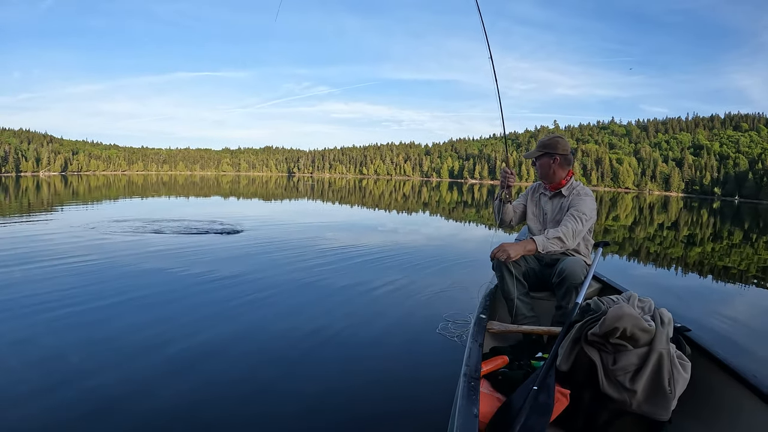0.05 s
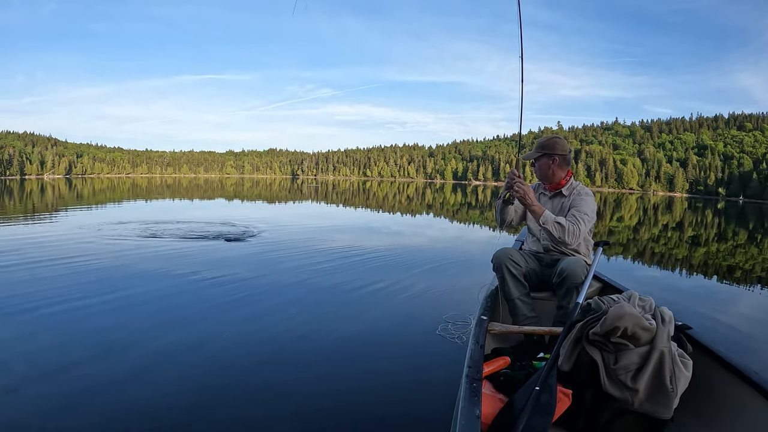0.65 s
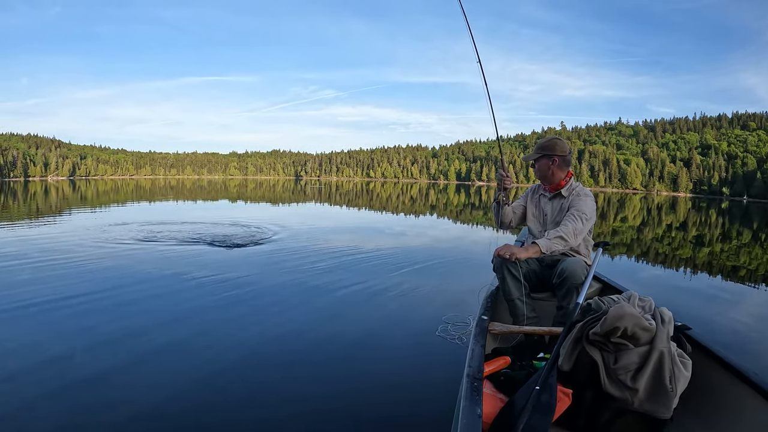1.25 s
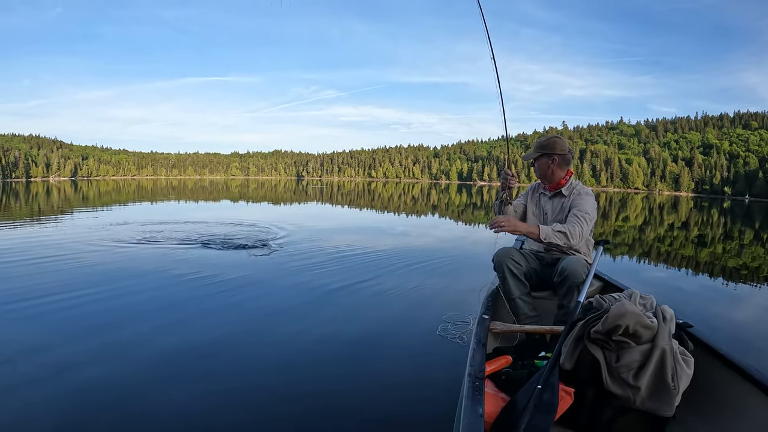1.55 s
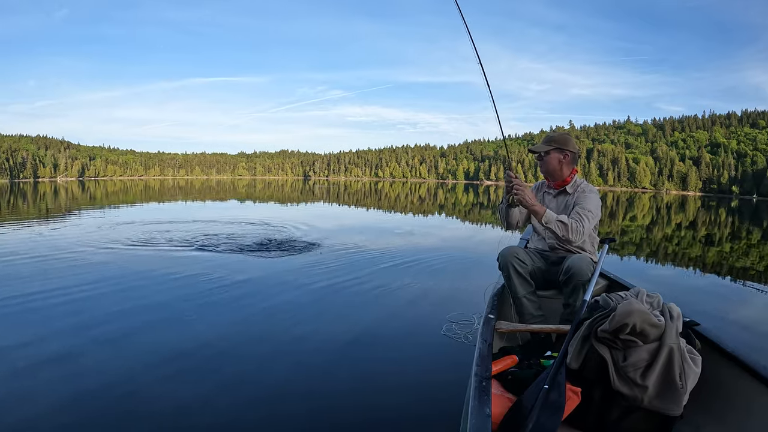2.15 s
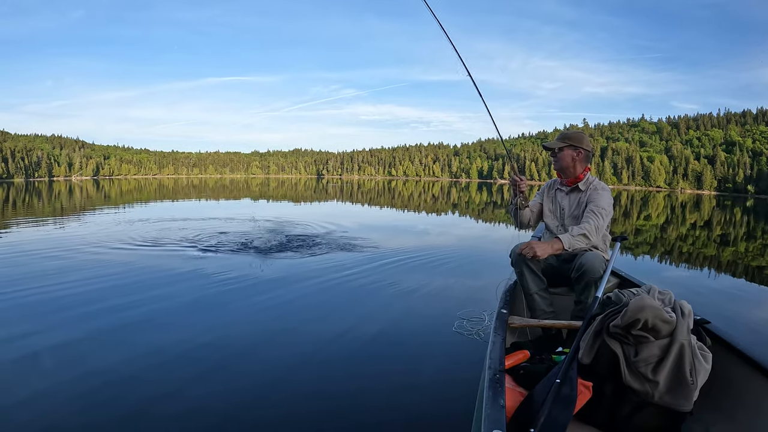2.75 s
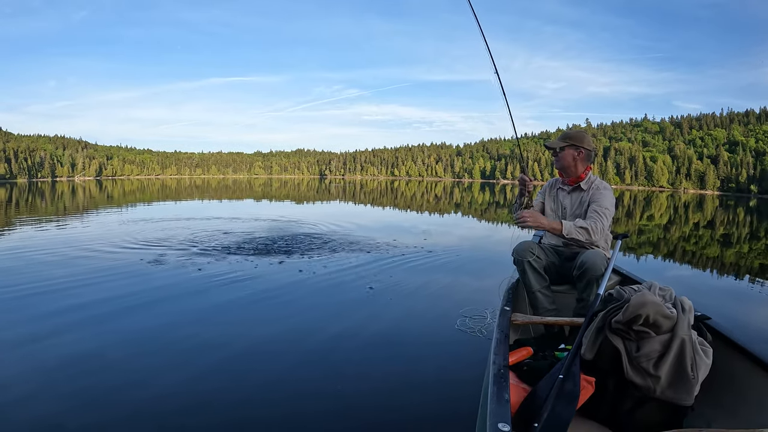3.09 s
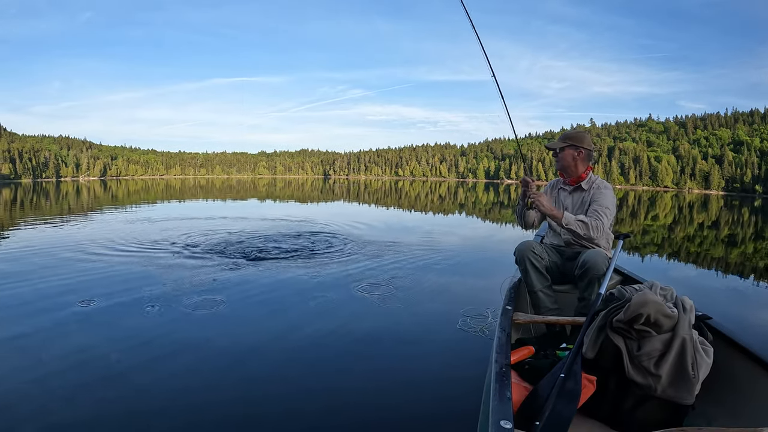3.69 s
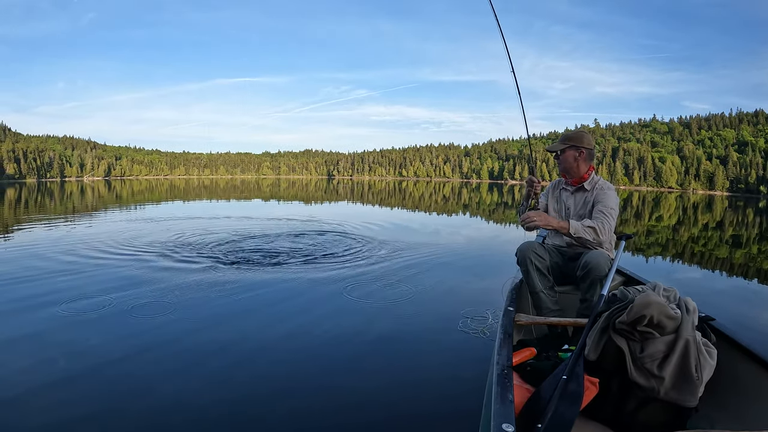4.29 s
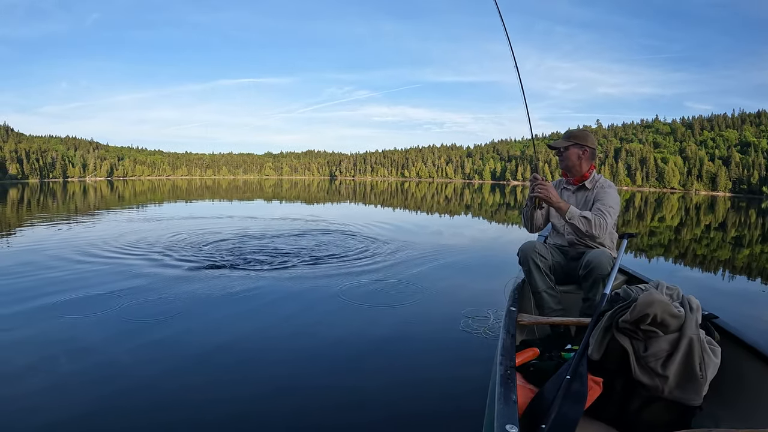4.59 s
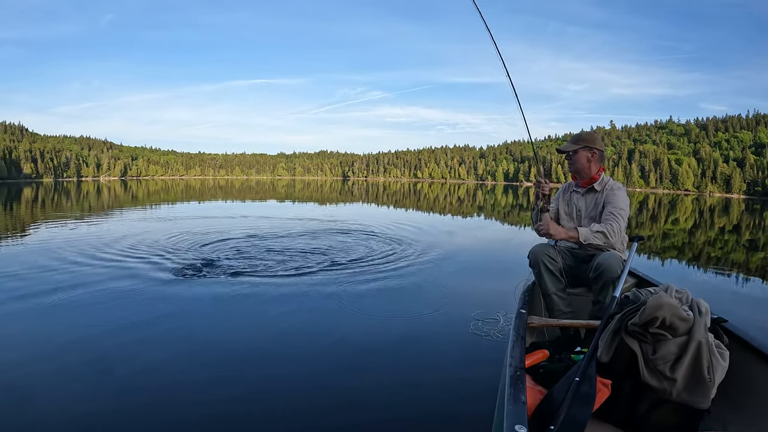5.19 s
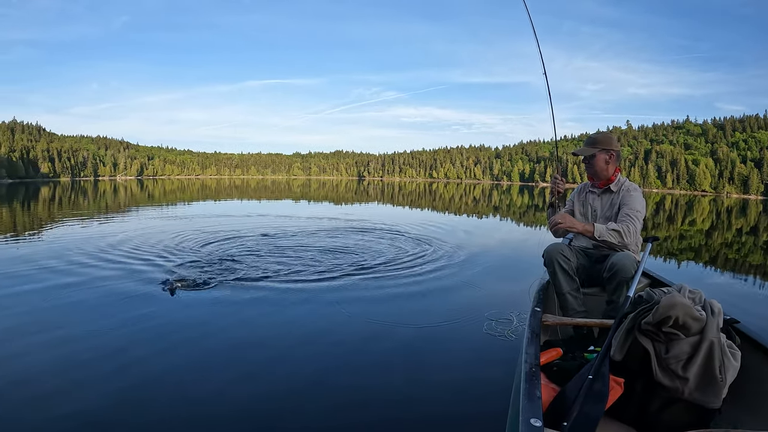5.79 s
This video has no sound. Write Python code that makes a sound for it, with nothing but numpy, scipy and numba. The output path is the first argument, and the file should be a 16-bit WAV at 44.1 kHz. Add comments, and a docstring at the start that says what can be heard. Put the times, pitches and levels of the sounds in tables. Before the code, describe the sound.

A fish struggles at the surface of a calm lake, a few metres ahead of the microphone. Small plips and a short hiss of fishing line build into a burst of splashing, with deep gulps, bubbles and spray. Drops patter back, then lighter plops and slaps follow between more pulls of line. A faint low rumble lies underneath, and the far shore returns a soft echo.

```python
"""A hooked fish beside a canoe

A fish thrashes at the surface of a calm lake, a few metres away. Torn water traps bubbles that ring
and glide upward, spray patters back, and small waves plop and slap. The angler pulls wet line through
the rod guides in short hisses. A faint rumble lies under it all, and the far shore echoes."""
import sys
import numpy as np
from scipy import signal
from scipy.fft import rfft, irfft
from scipy.io import wavfile
from scipy.ndimage import uniform_filter1d
from numba import njit

SR = 44100
rng = np.random.default_rng(int(sys.argv[2]) if len(sys.argv) > 2 else 0)


def dump_mix(stems):
    """Bounce the given channels to the path in sys.argv[1] as a 16-bit WAV at rate SR."""
    frames = np.atleast_2d(stems).T  # one column per channel
    limited = np.clip(frames, -1, 1)  # hard clip at full scale
    pcm = np.round(limited * 32767).astype(np.int16)
    wavfile.write(sys.argv[1], SR, pcm)


N = 257544
TIME = np.arange(N) / SR

# The tone of the lake air, the line's hiss, its rasp and the spray.
# Each row: frequency in Hz, relative level in dB.
AIR_TONE = [(25, -40), (58, -5.5), (115, -11.5), (165, 7), (330, -12.5), (700, -19), (7000, -31),
            (9500, -41), (15500, -44)]
HISS_TONE = [(1400, -22.5), (3600, -5.5), (4100, -1.5), (5700, -1.5), (6200, 4), (8100, -2), (8800, -13),
             (11000, -15), (15000, -38)]
RASP_TONE = [(650, -57), (1300, 2.5), (6800, 3), (12000, -81)]
SPRAY_TONE = [(1600, -3), (3400, 5.5), (7300, 0.5), (9000, -8), (15000, -20.5)]
# Pulls of the line. Each row: start, fastest moment and stop in seconds, hiss level in dB,
# rasp and guide ring in dB relative to the hiss, a multiplier for the guides' pitch.
LINE_PULLS = [(-.3, 0.071, 0.13, -40.5, -30, -6, .94), (0.995, 1.293, 1.378, -36.5, -13.5, -7, .945),
              (3.82, 3.9, 4.138, -39, -12, -4, 1), (3.97, 4.03, 4.138, -33.5, -12, -2, 1),
              (5.022, 5.244, 5.297, -33.5, 1.5, -3, 1.015)]
# The pitches in Hz at which the rod guides ring, before that multiplier.
GUIDE_PITCHES = [4255, 4810, 5360, 6420, 7000]
# Small bubbles made by drops. Each row: start in seconds, relative level in dB, starting pitch in Hz.
DROP_BUBBLES = [(0.154, -43, 1780), (0.208, -38, 1510), (0.3232, -32.5, 2790), (0.8592, -32, 5560),
                (0.9092, -29.5, 4370), (1.0817, -34.5, 1206), (1.4214, -23.5, 2040), (1.4684, -24.5, 1920),
                (1.5466, -23.5, 2890), (1.597, -27.5, 1520), (1.5999, -20, 2970), (1.6059, -21, 2650),
                (1.711, -20.5, 2730), (1.81, -14, 1730), (1.862, -20.5, 2510), (2.188, -23.5, 1150),
                (2.204, -18.5, 2890), (2.546, -16.5, 1514), (2.884, -16.5, 1920), (3.2906, -30.5, 3370),
                (3.4968, -31.5, 3140), (3.7043, -27, 1273), (3.7673, -21, 1315), (3.8955, -26.5, 2270),
                (4.0975, -25, 1670), (4.359, -29.5, 1456), (4.968, -33.5, 2200), (5.0284, -16, 2230),
                (5.3301, -23, 4130), (5.365, -33, 1570), (5.425, -32, 2680)]
# Rising air pockets. Each row: start in seconds, starting pitch in Hz, level in dB,
# seconds to fade by 60 dB (a minus sign is ignored), octaves climbed meanwhile (minus means falling).
AIR_POCKETS = [(0.545, 1017, -52, 0.07, 2.2), (0.94, 520, -38, -0.1, 1.5), (0.957, 794, -28.5, 0.02, 1.2),
               (1.43, 427, -28, 0.01, .4), (1.48, 282, -47.5, 0.07, 0.7), (1.549, 418, -40.5, 0.07, 1.6),
               (1.748, 477, -34, 0.17, 0.9), (1.882, 460, -18, -0.02, 1.6), (1.936, 997, -20, .021, .2),
               (2.051, 400, -19.5, .06, .4), (2.499, 385, -12.5, .048, .5), (2.595, 440, -8.5, .034, .3),
               (2.598, 1150, -18, .025, .3), (2.656, 261, -23, .09, .4), (3.022, 600, -17, .026, 1.8),
               (3.3235, 2600, -18, .0036, 2), (3.352, 1300, -27, .014, 1.6), (3.412, 2400, -18, .0055, 2.1),
               (3.423, 414, -32, .055, 0), (3.735, 1020, -28, .055, 1), (4.574, 1300, -11.5, .014, .6),
               (4.593, 630, -25, .06, 2), (4.704, 1050, -32, .024, -.3), (4.727, 1400, -30, .035, .6),
               (4.984, 1597, -33, 0.12, 1.1), (5.21, 1033, -29, 0.0342, -0.5),
               (5.237, 1302, -12.5, 0.0272, -0.13), (5.421, 387, -46, 0.18, 0.9),
               (5.543, 850, -41.5, 0.18, 1.85), (5.641, 582, -36.5, 0.08, .5), (5.8, 630, -39, .1, 2)]
# Sharp slaps and landing drops. Each row: start in seconds, relative level in dB, pitch in Hz.
WATER_SLAPS = [(1.42, -29, 2440), (1.798, -28, 990), (2.105, -27, 1340), (2.304, -24, 2200),
               (2.786, -24, 2720), (2.9094, -19.5, 7200), (3.471, -35, 8500), (3.59, -34, 7400),
               (3.611, -36, 7400), (3.636, -33.5, 7040), (3.7839, -23, 7840), (4.3606, -36.5, 2800),
               (4.5666, -24.5, 5900), (4.585, -23, 6700), (5.0317, -22.5, 6500), (5.158, -24, 4700),
               (5.236, -27, 1700), (5.3541, -33.5, 5660), (5.6414, -40, 4900)]
# Strokes of body and tail, and the surges they leave. Each row: time of the peak in seconds,
# level in dB, length in seconds, deep gulp and spray in dB relative to that level.
FISH_STROKES = [(0.968, -48.5, 0.15, -9, -5.5), (1.327, -42, 0.091, -21.5, -17),
                (1.452, -34.5, 0.037, -3.5, -8), (1.608, -42.5, 0.068, -27, -4),
                (1.806, -24, 0.064, -13, -17.5), (1.877, -30.5, 0.074, -2, -27),
                (2.013, -26, 0.027, -21, -17), (2.102, -26.5, 0.044, -2, -14),
                (2.217, -33.5, 0.44, -14.5, -13.5), (2.312, -24, 0.03, -30, -16),
                (2.382, -31.5, 0.17, -28, -11.5), (2.545, -23.5, 0.12, -4, -15),
                (2.674, -23, 0.18, -4.5, -10.5), (2.802, -26.5, 0.096, -10.5, -3.5),
                (2.884, -24, 0.071, -25, -20), (2.98, -29, 0.069, 0, -33), (3.037, -27, 0.049, -7.5, -12),
                (3.371, -41, 0.078, -30, -8.5), (3.786, -38.5, 0.11, -32, -6.5),
                (4.507, -42, 0.034, -26, -3), (4.739, -40, 0.019, -7, -4), (5.84, -28, 0.021, -38, -8.5)]
# How far the left side's wave runs ahead of the right. Each row: frequency in Hz, lead in radians.
LEFT_LEAD = [(1000, 0.08), (3400, -0.67), (9000, 0.031)]


def undb(db):
    """Turn decibels into a volume multiplier."""
    return 10 ** (np.asarray(db) / 20)


def unit(x):
    """Scale a signal to an average power of 1."""
    return x / np.sqrt(np.mean(x ** 2))


def band(x, hz, q):
    """Keep the sound near one pitch; a higher q is narrower and rings longer."""
    return signal.lfilter(*signal.iirpeak(min(hz, .45 * SR), q, fs=SR), x)


def colour(x, tone, size=4096):
    """Filter a sound so that it follows a tone table."""
    hz, db = np.transpose(tone)
    grid = np.maximum(np.fft.rfftfreq(size, 1 / SR), 1)
    gain = undb(np.interp(np.log(grid), np.log(hz), db))
    # this folding makes the filter ring only after a sound, never before it
    cepstrum = irfft(np.log(gain))
    cepstrum[1:size // 2] *= 2
    cepstrum[size // 2 + 1:] = 0
    return signal.fftconvolve(x, irfft(np.exp(rfft(cepstrum))))[:N]


def wander(rate):
    """A random drift of size about 1 that takes `rate` new turns a second."""
    hold = int(SR / rate)
    steps = np.repeat(rng.standard_normal(N // hold + 1), hold)
    return unit(uniform_filter1d(steps, hold)[:N])


def smear(x, fade_s):
    """Give a sound a noisy tail, 0.1 seconds long, that falls 60 dB per fade_s."""
    t = TIME[:SR // 10]
    tail = rng.standard_normal(len(t)) * undb(-60 * t / fade_s)
    return signal.fftconvolve(x, tail / np.linalg.norm(tail))[:N]


def linger(power, shape):
    """Spread power over later times, following the given shape."""
    return np.maximum(signal.fftconvolve(power, shape / shape.sum())[:N], 0)


@njit
def ring(starts, hz, size, fade_s, octaves, swell_cycles, hold, wobble):
    """Bubbles swell quickly, glide in pitch and fade by 60 dB; a hold above 1 delays the fading."""
    out = np.zeros(N)
    for k in range(len(starts)):
        start, phase = int(starts[k] * SR), 0.
        for i in range(min(int(fade_s[k] * SR), N - start)):
            age = i / SR / fade_s[k]
            pitch = hz[k] * 2 ** (octaves[k] * age ** 1.3 + wobble[start + i])
            phase += 2 * np.pi * min(pitch / SR, .45)
            swell = -np.expm1(-i / SR * hz[k] / swell_cycles)
            out[start + i] += size[k] * swell * np.exp(-6.9 * age ** hold) * np.sin(phase)
    return out


def lake_air(level_db=-57.5, left_db=-6.5, right_db=2, waver_db=4, rumble_hz=400):
    """A far, wavering rumble and a faint, even hiss, both stronger on the right."""
    shared, left, right = (unit(colour(rng.standard_normal(N), AIR_TONE)) for _ in range(3))
    pair = np.array([undb(left_db) * (shared + left), undb(right_db) * (shared + right)])
    rumble = signal.sosfiltfilt(signal.butter(2, rumble_hz, fs=SR, output="sos"), pair)
    hiss = pair - rumble
    return undb(level_db) * (hiss + rumble * undb(waver_db * wander(13)))


def fishing_line(grain_db=1.5):
    """Wet line hisses and rings the guides, louder as it speeds up; tension adds a rasp."""
    out = np.zeros(N)
    hiss, rasp = (unit(colour(rng.standard_normal(N), tone)) for tone in (HISS_TONE, RASP_TONE))
    for start, fastest, stop, db, rasp_db, ring_db, ratio in LINE_PULLS:
        speed = np.clip((TIME - start) / (fastest - start), 0, 1) ** .91
        brake = np.clip((stop - TIME) / (stop - fastest), 0, 1) ** .43
        rub = rng.standard_normal(N)
        guides = unit(sum(band(rub, hz * ratio, q=120) for hz in GUIDE_PITCHES))
        out += speed * brake * undb(db) * (hiss + undb(rasp_db) * rasp + undb(ring_db) * guides)
    return out * undb(grain_db * wander(610))


def plips(gain_db=6.5, cycles=40.3, glide_octaves=-.22):
    """Drops pinch off small bubbles that ring briefly and sag a little in pitch."""
    starts, db, hz = np.array(DROP_BUBBLES, float).T.copy()
    return ring(starts, hz, undb(db + gain_db), cycles / hz, np.full(len(starts), glide_octaves),
                swell_cycles=1.6, hold=1., wobble=.05 * wander(250))


def plops(flutter_db=3):
    """Air pockets ring, wobbling as their shape changes; most climb in pitch as they surface."""
    starts, hz, db, fade_s, octaves = np.array(AIR_POCKETS, float).T.copy()
    tones = ring(starts, hz, undb(db), np.abs(fade_s), octaves,
                 swell_cycles=1.25, hold=1.99, wobble=.068 * wander(250))
    return tones * undb(flutter_db * wander(200))


def spatter(popping, gain_db=-15, hz=1800):
    """Torn water around each plip and plop leaves a short, thin tail behind its ring."""
    return undb(gain_db) * band(smear(popping * wander(hz), fade_s=.045), hz, q=.78)


def slaps(gain_db=7, click_cycles=6, splatter_db=-12, splatter_cycles=75):
    """Water strikes water: a rounded click and a splatter near the same pitch; low slaps last longer."""
    starts, db, hz = np.array(WATER_SLAPS, float).T.copy()
    size = undb(db + gain_db)
    out = ring(starts, hz, size, click_cycles / hz, np.zeros(len(starts)),
               swell_cycles=.4, hold=1., wobble=np.zeros(N))
    t = TIME[:SR // 10]
    for start, strength, pitch in zip(starts, size, hz):
        splatter = unit(band(rng.standard_normal(len(t)), pitch, q=.98))
        splatter *= strength * undb(splatter_db - 60 * t * pitch / splatter_cycles)
        i = int(start * SR)
        out[i:i + len(t)] += splatter[:N - i]
    return colour(out, [(300, -47), (1000, 14), (7500, 10), (9500, .5), (15000, -9)])


def swarm(db, rate, low_hz, high_hz, cycles, scatter_db, thinning=.22):
    """Up to `rate` bubbles a second, together following db; calm water makes fewer and smaller ones."""
    count = int(rate * N / SR)
    when, pitch, strength, life, climb, birth = rng.random((count, 6)).T
    starts = (np.arange(count) + when) / rate
    local_db = np.interp(starts, TIME, db)
    busy = np.minimum(undb(thinning * (local_db + 29)), 1)  # the chance that a bubble forms
    hz = low_hz * (high_hz / low_hz) ** (1 - pitch * busy ** .5)
    fade_s = cycles * 2 ** (2 * life - 1) / hz / busy ** .5
    # most are faint and a few stand out; short rings start harder
    size = undb(scatter_db * strength ** 2) / np.sqrt(fade_s)
    crowd_power = np.mean(size ** 2 * fade_s) * rate * busy / (6 * np.log(1000))
    size = (birth < busy) * size / np.sqrt(crowd_power) * undb(local_db)
    return ring(starts, hz, size, fade_s, climb - .2, swell_cycles=.99, hold=1., wobble=np.zeros(N))


def stroke_levels(rise_db=23, fall_db=17, settle_db_per_s=18, flight_s=.57, gulp_lead_s=.011):
    """Levels in dB of churning, gulps, spray and landing drops as each stroke swells and fades."""
    churn, deep, spray = np.zeros((3, N))
    for peak_s, db, length, gulp_db, spray_db in FISH_STROKES:
        age = (TIME - peak_s) / length
        power = undb(db + np.minimum(rise_db * age, -fall_db * age)) ** 2
        churn += power
        deep += power * undb(gulp_db) ** 2
        spray += power * undb(spray_db) ** 2
    # the water seethes and fizzes on after a stroke, and thrown spray lands later
    seething = undb(-13) ** 2 * linger(churn, undb(-settle_db_per_s * TIME) ** 2)
    fizz = undb(-4.5) ** 2 * seething
    landing = undb(-10.5) ** 2 * linger(spray, np.exp(-.5 * ((TIME - flight_s) / .13) ** 2))
    deep = np.interp(TIME + gulp_lead_s, TIME, deep)  # the fish digs in before the surface breaks
    layers = (churn + seething, -73), (deep, -73), (spray + fizz, -77), (landing, -77)
    return [10 * np.log10(power + undb(calm_db) ** 2) for power, calm_db in layers]


def thrash(popping, shed_db=-17, foam_db=-6, spray_gain_db=6):
    """The fish tears the water into deep gulps, swarms of bubbles, fine spray and bursting foam."""
    churn_db, deep_db, spray_db, landing_db = stroke_levels()
    # every plip and plop sheds more bubbles as it rings
    ringing = np.abs(uniform_filter1d(np.abs(popping), SR // 100))
    bubble_db = 20 * np.log10(undb(churn_db) + undb(shed_db) * ringing)
    gulps = swarm(deep_db, rate=100, low_hz=313, high_hz=736, cycles=10.4, scatter_db=3)
    medium = swarm(bubble_db - 1.47, rate=330, low_hz=620, high_hz=1900, cycles=22, scatter_db=18)
    small = swarm(bubble_db - 5.5, rate=330, low_hz=1900, high_hz=3700, cycles=29, scatter_db=12)
    drops = swarm(spray_db, rate=1100, low_hz=2940, high_hz=12800, cycles=4.6, scatter_db=13,
                  thinning=.33)
    patter = swarm(landing_db, rate=170, low_hz=2600, high_hz=13000, cycles=8, scatter_db=15)
    foam = unit(np.diff(rng.standard_normal(N + 1)) + 2 * rng.standard_normal(N))
    foam *= undb(spray_db + foam_db + 5.82 * wander(150))
    # the sheet of water itself rushes when the fish drives hard
    rush = unit(band(band(rng.standard_normal(N), 1250, q=.7), 1250, q=.7))
    rush *= undb(churn_db - 1 + .4 * (churn_db - churn_db.max()))
    spray = undb(spray_gain_db) * colour(drops + patter + foam, SPRAY_TONE)
    return gulps + medium + small + rush + spray


def scene(left_db=-1.25, left_treble=.38, spread_db=-7, ripple_db=-19, echo_db=-6, echo_s=1.66):
    """Mix fish and line almost straight ahead, with their echoes and the lake air around them."""
    popping = plops() + plips()
    direct = popping + spatter(popping) + thrash(popping) + slaps() + fishing_line()
    # small splashes make no deep bass
    direct = signal.sosfilt(signal.butter(2, 70, "highpass", fs=SR, output="sos"), direct)
    # ripples and the hull scatter a soft tail behind every sound, different on each side
    scattered = undb(ripple_db) * np.array([smear(direct, fade_s=.37) for _ in range(2)])
    # the left side is slightly shifted and brighter, and the treble flickers between the sides
    lead = np.interp(np.fft.rfftfreq(N, 1 / SR), *np.transpose(LEFT_LEAD))
    left = irfft(rfft(direct) * np.exp(1j * lead), N)
    treble = signal.sosfiltfilt(signal.butter(1, 5600, "highpass", fs=SR, output="sos"), left)
    flicker = undb(spread_db) * np.diff(treble, prepend=0) * wander(300)
    pair = np.array([undb(left_db) * left + left_treble * treble + flicker, direct - flicker])
    # the wooded far shore sends the splash back late, smeared and dull
    dull = band(scattered, hz=1900, q=.98)
    echo = np.pad(dull, ((0, 0), (int(echo_s * SR), 0)))[:, :N]
    return pair + undb(echo_db) * echo + scattered + lake_air()


def record(dry):
    """Cut away the highest treble, above 15500 Hz."""
    return signal.sosfilt(signal.ellip(8, .2, 70, 15500, fs=SR, output="sos"), dry)


dry = scene()
out = record(dry)
dump_mix(out)
```